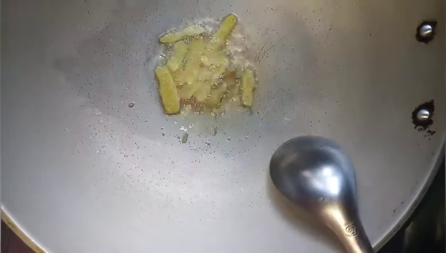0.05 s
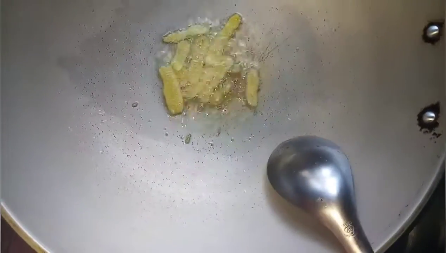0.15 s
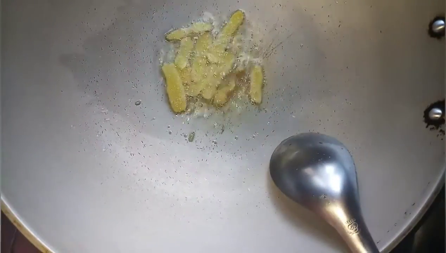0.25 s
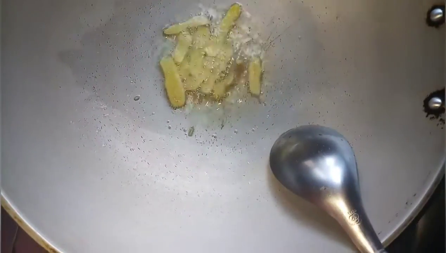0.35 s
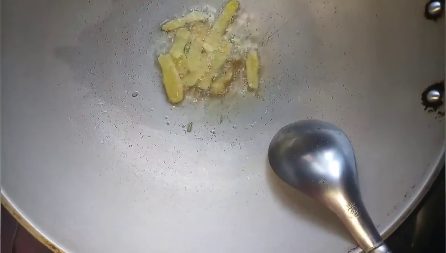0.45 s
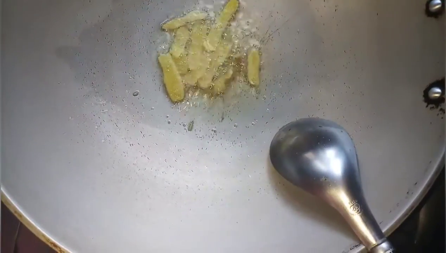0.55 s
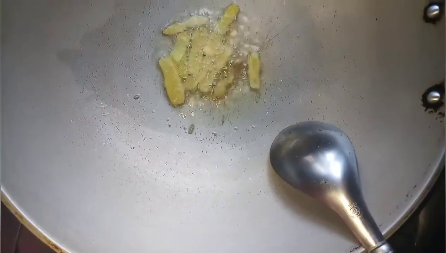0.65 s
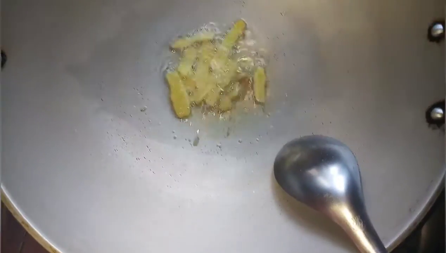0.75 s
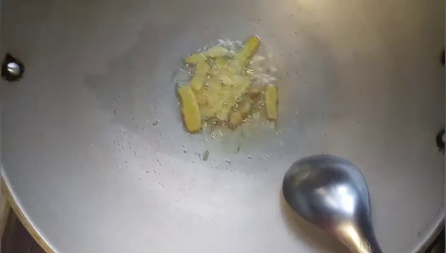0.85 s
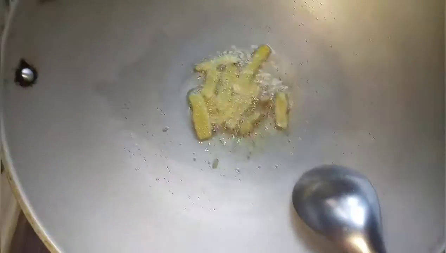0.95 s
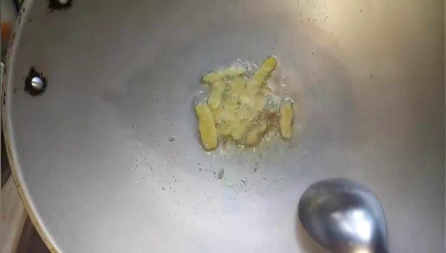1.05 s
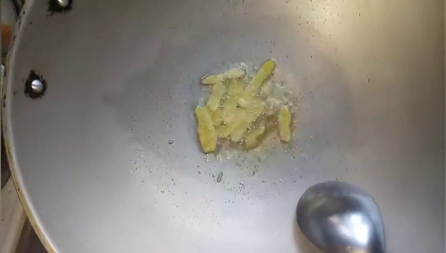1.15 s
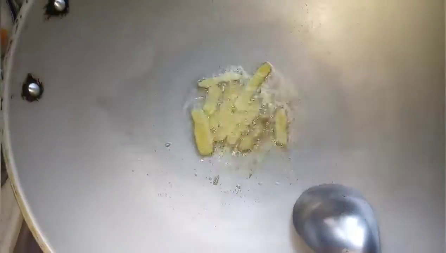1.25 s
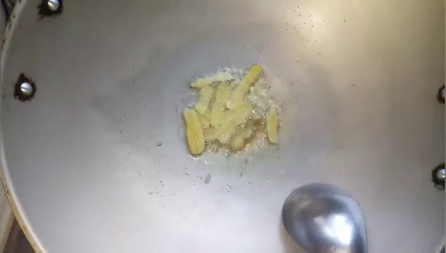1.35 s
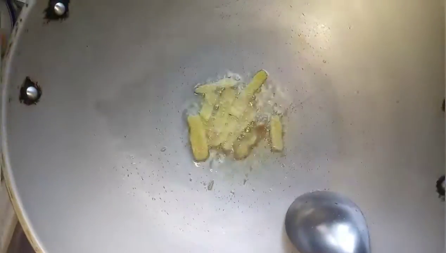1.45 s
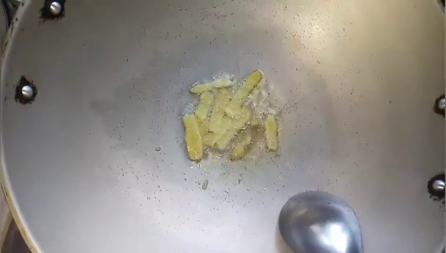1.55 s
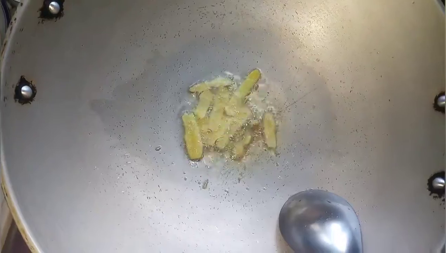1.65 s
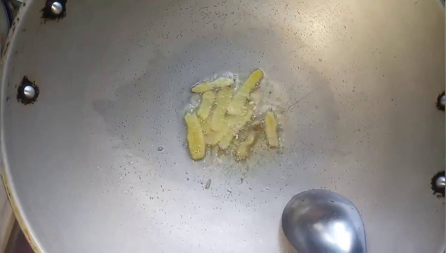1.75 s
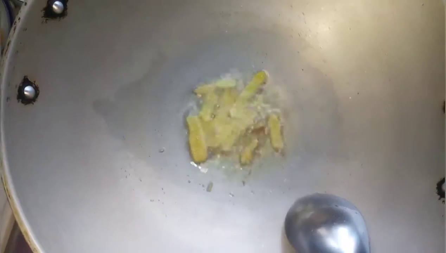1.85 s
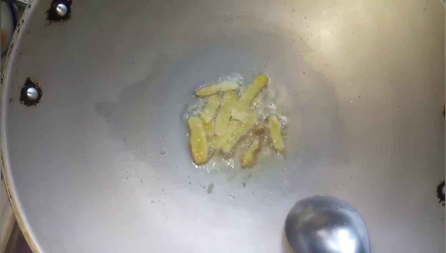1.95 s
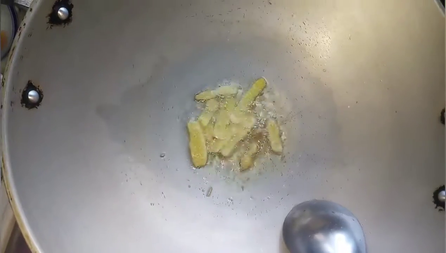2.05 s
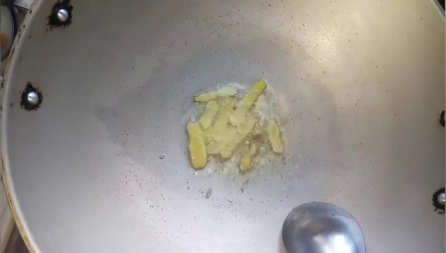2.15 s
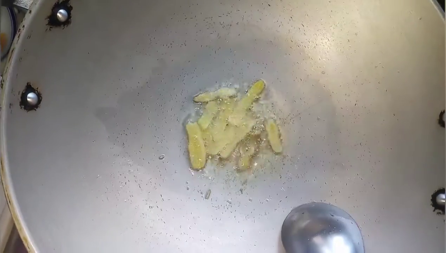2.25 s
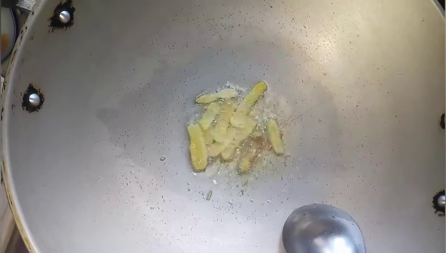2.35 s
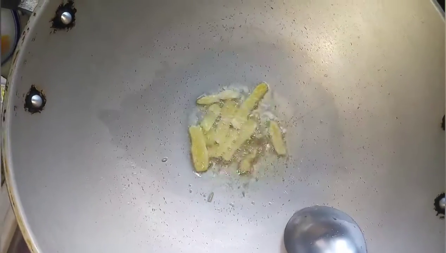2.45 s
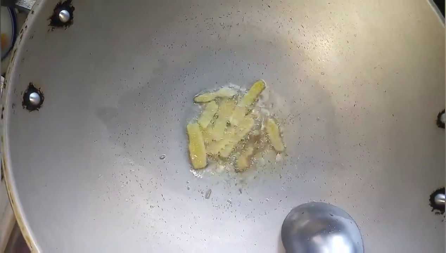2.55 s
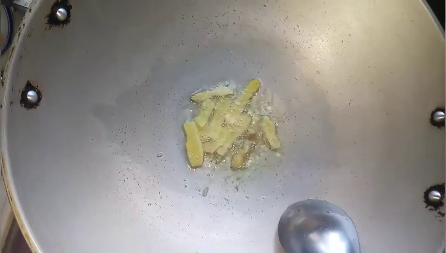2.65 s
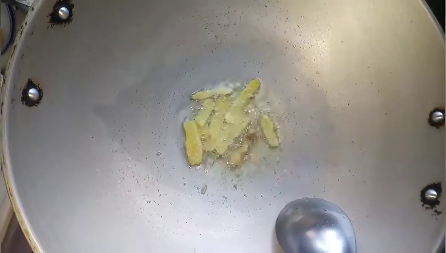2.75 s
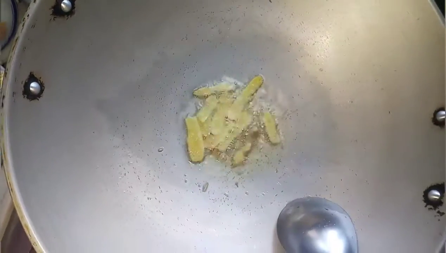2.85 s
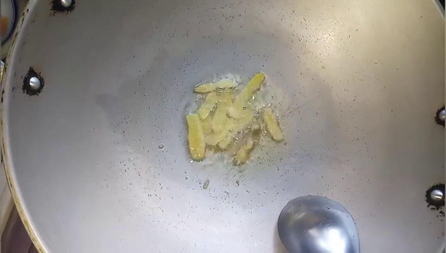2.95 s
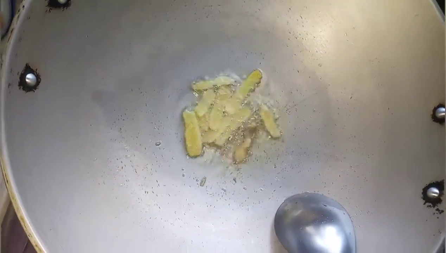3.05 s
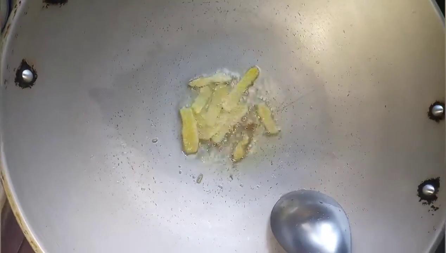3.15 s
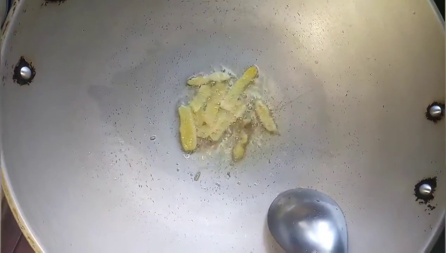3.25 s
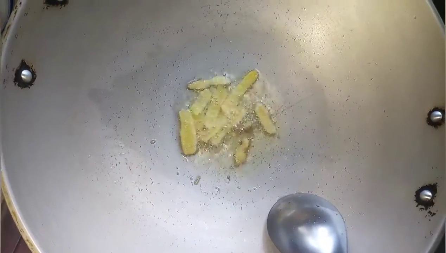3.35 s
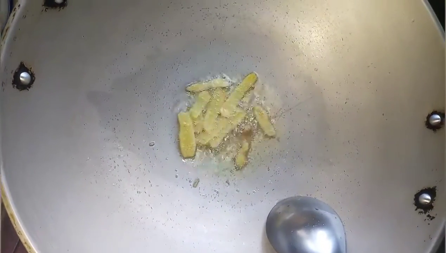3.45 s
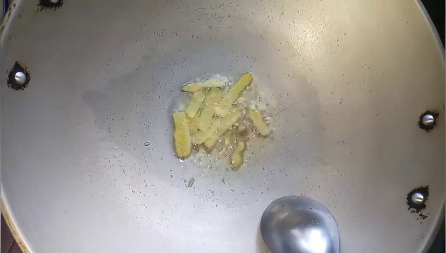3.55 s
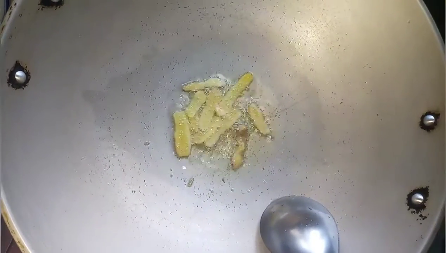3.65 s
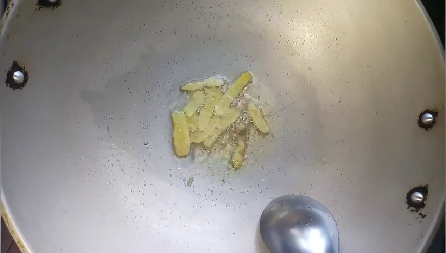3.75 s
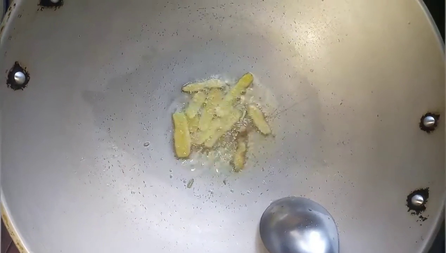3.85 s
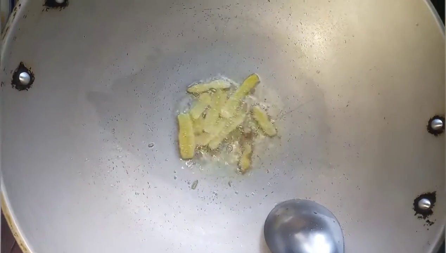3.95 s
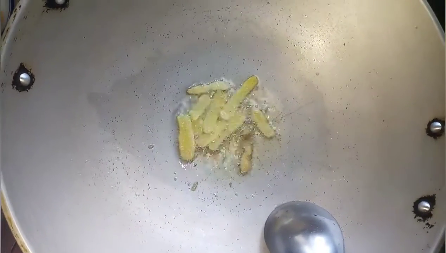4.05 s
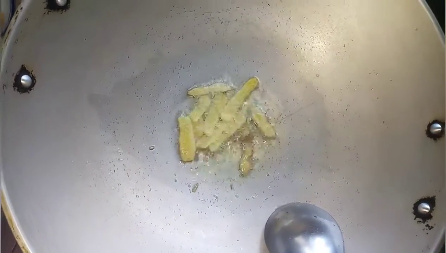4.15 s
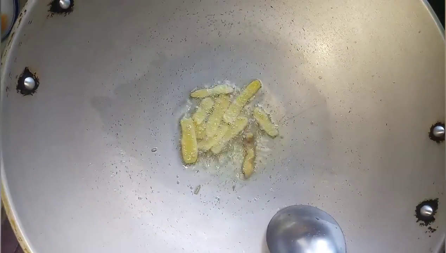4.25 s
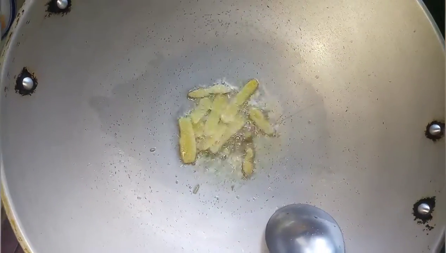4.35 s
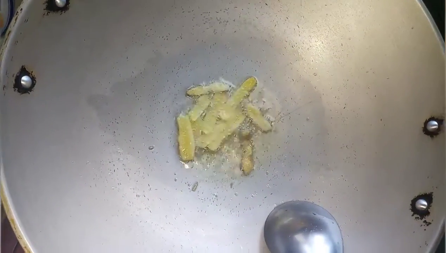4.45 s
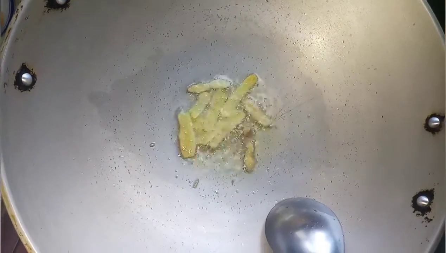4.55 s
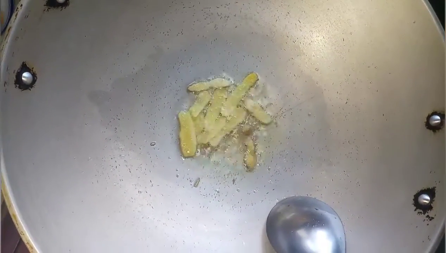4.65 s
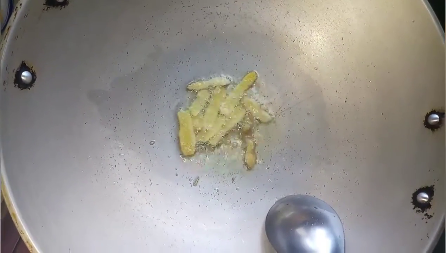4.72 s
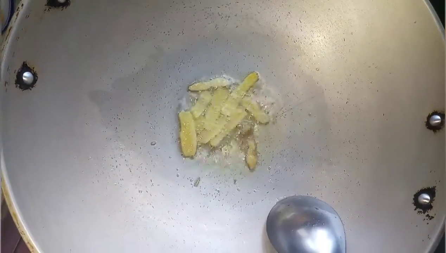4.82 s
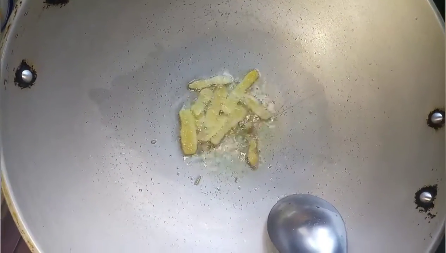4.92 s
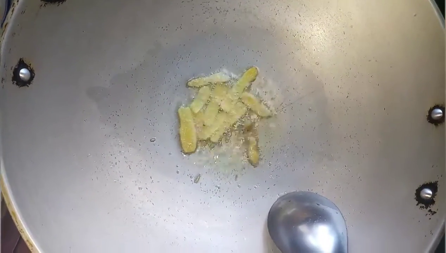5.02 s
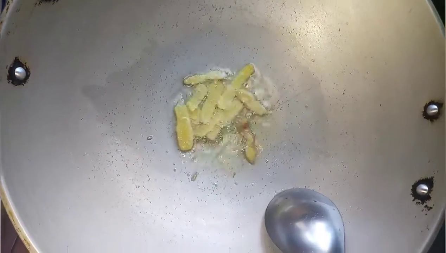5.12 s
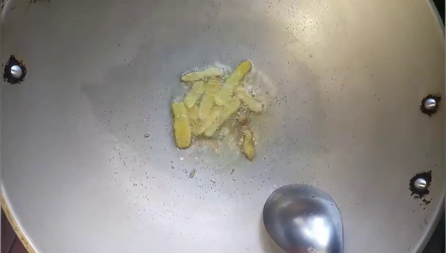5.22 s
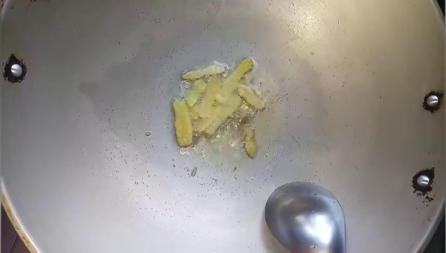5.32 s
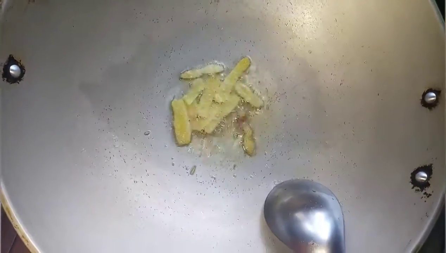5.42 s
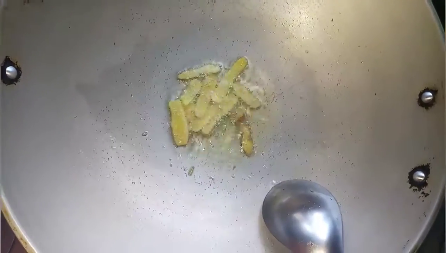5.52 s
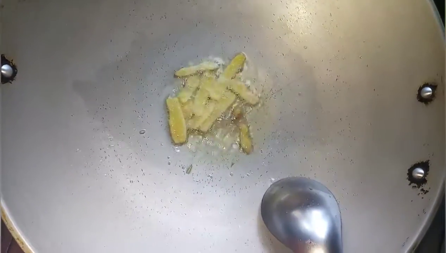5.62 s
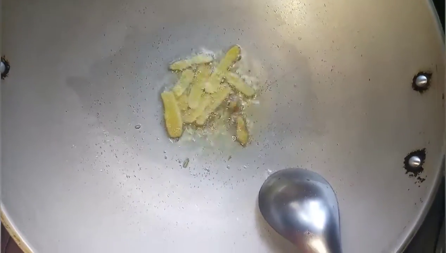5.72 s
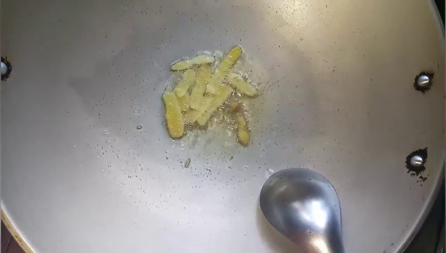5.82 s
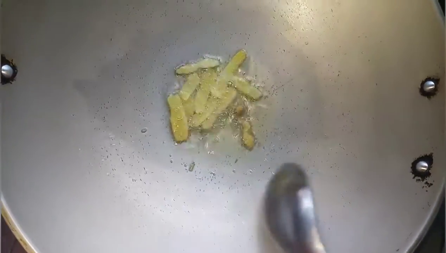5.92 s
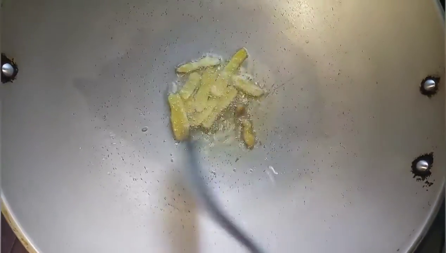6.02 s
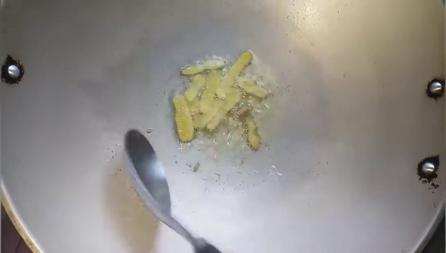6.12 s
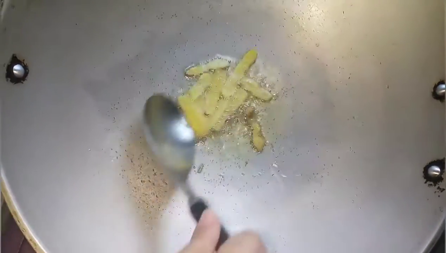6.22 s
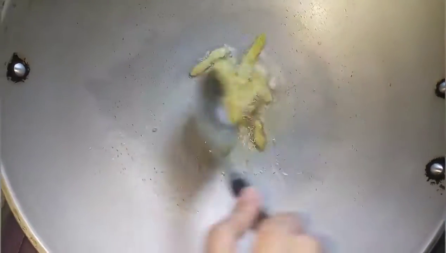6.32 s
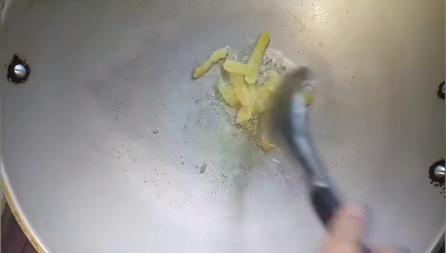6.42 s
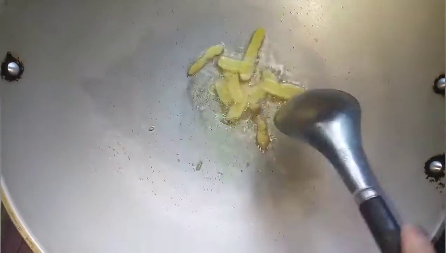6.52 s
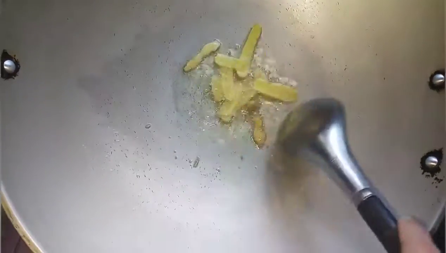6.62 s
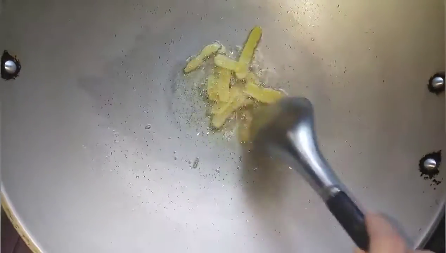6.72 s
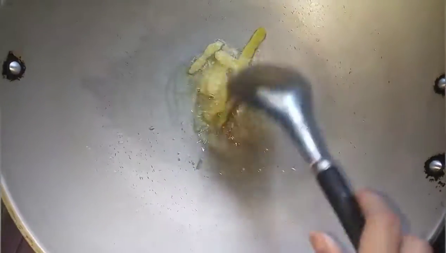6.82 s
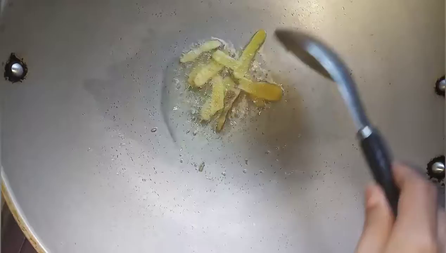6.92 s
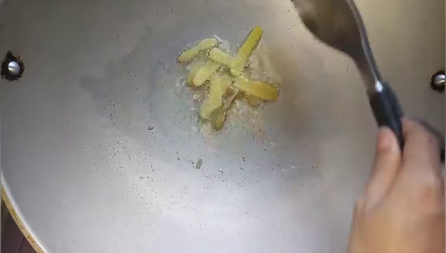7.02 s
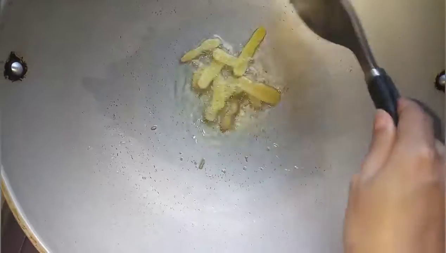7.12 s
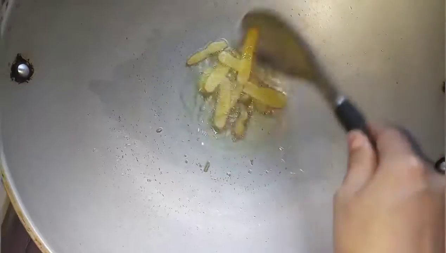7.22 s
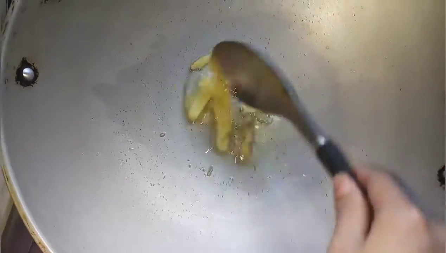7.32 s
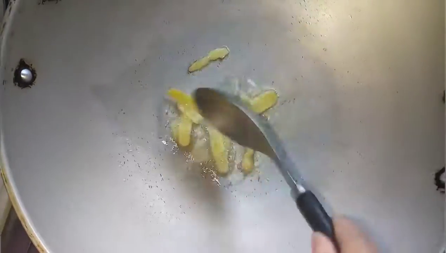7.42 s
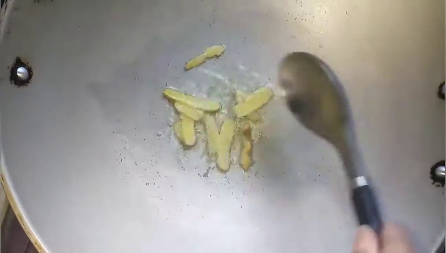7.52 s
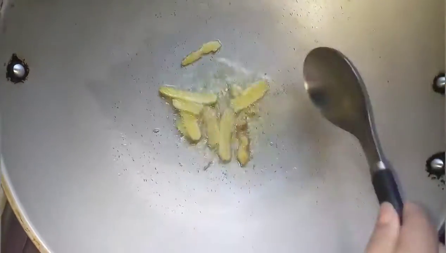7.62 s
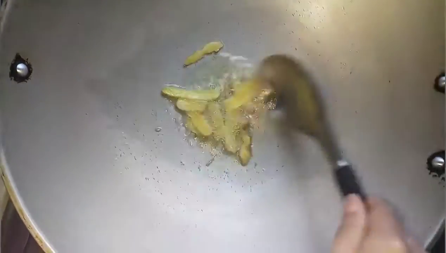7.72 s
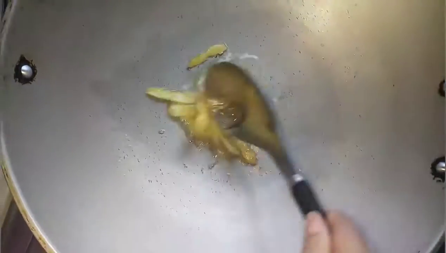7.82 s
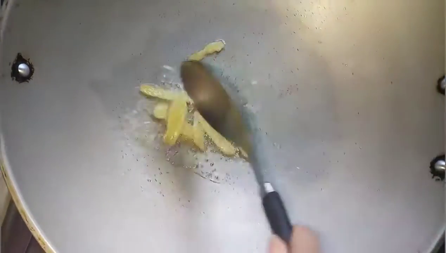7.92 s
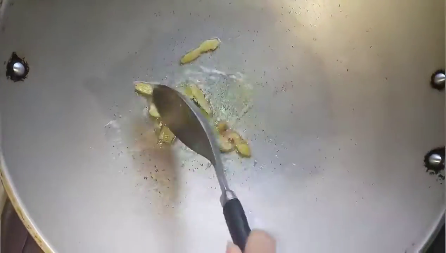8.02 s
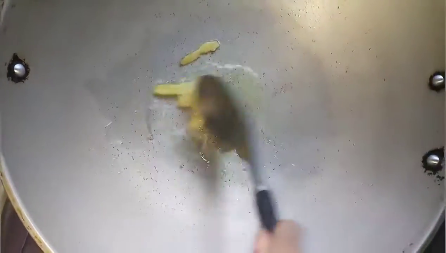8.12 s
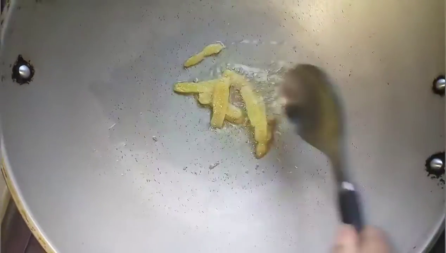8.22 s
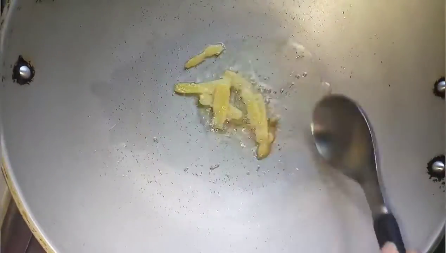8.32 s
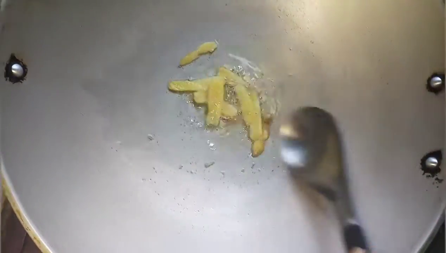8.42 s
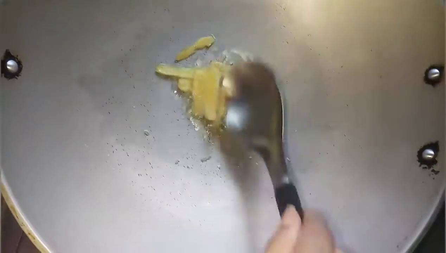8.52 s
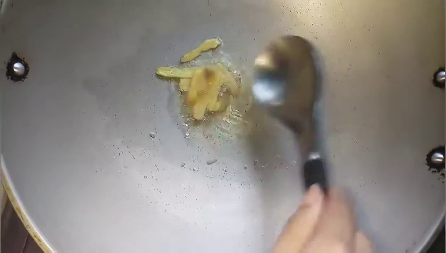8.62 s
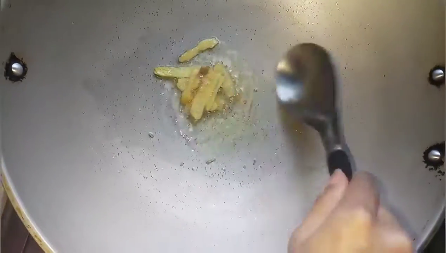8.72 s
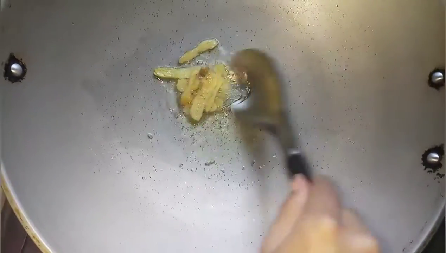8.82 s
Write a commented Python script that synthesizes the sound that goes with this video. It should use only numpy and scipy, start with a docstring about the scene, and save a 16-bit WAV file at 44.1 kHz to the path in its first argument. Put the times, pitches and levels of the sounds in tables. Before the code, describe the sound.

Close above a thin metal wok, ginger strips fry in a little oil with a soft steady fizz over low burner rumble and a faint wavering hum. A ladle clacks down and scrapes briefly at the start. Then only sizzle and sharp spitting pops for several seconds, until the ladle returns after six seconds, striking and scraping the metal in spaced bright clanks. Small, fairly dry kitchen, stereo.

```python
"""Ginger strips sizzle in hot oil in a thin metal wok, over the rumble and hum of a kitchen: shaped noise and low tones.
A metal ladle knocks the wok, bounces and scrapes along it: clicks excite damped modes of metal.
Steam bubbles burst and spit: short sprays of clicks excite resonances of bubble and bowl.
A small device with two microphone ports hangs above the pan and takes one knock, a brief falling tone."""
import sys
import numpy as np
from scipy import signal
from scipy.fft import rfft, irfft, next_fast_len
from scipy.io import wavfile
from scipy.ndimage import uniform_filter1d

SR = 44100
rng = np.random.default_rng(int(sys.argv[2]) if len(sys.argv) > 2 else 0)


def store_pcm(level_fs):
    """Save levels as 16-bit WAV."""
    pcm = np.round(np.clip(level_fs, -1, 1) * 32767).astype(np.int16)
    wavfile.write(sys.argv[1], SR, np.atleast_2d(pcm).T)


def natural_amplitude(level_db):
    """Convert a level in decibels to a linear amplitude factor, elementwise."""
    exponent = np.asarray(level_db, float) / 20
    return 10 ** exponent


N = 391166  # length in samples

# How hard the oil boils. Each row: time in seconds, relative level in dB.
BOIL_LEVEL = [(0.0, -47), (0.39, -49.5), (1.68, -46), (2.74, -47), (3.68, -46.5), (4.37, -47), (4.99, -47),
              (6.3, -47.5), (7.61, -50.5), (8.1, -50), (8.35, -46), (8.87, -48)]
# Spectrum of the sizzle. Each row: frequency in Hz, relative density in dB per Hz.
SIZZLE_SPECTRUM = [(290, -54), (500, -6), (698, -5.5), (868, -13), (1020, -5), (1480, -2), (1690, -4.5),
                   (3150, -5), (4400, -3.5), (7000, -3), (13300, -18.5), (16000, -25)]
# The air in the bowl lifts some bands and cancels others. Each row: centre in Hz, width in Hz, gain in dB.
BOWL_AIR = [(900, 23, -5), (993, 78, 6.5), (1240, 19, -21.5), (1484, 240, 2.5), (1650, 140, -10),
            (2256, 50, 6.5), (2800, 22, 8.5), (3140, 46, 12.5), (3496, 360, 7), (7130, 260, 2),
            (8180, 260, 3), (9300, 550, 1.5)]
# Spectrum of burner and room rumble. Each row: frequency in Hz, relative density in dB per Hz.
RUMBLE_SPECTRUM = [(12, -55), (20, -23), (54, -12), (82, -2.5), (113, -1), (151, -5.5), (191, -9.5),
                   (242, -2), (301, -10), (380, -6.5), (872, -32.5), (1010, -29), (1500, -22.5),
                   (1950, -71), (3300, -120)]
# Level of the wavering low tone. Each row: time in seconds, rms level in dB.
HUM_LEVEL = [(0.0, -63), (2.05, -57), (5.83, -57.5), (6.3, -60), (8.87, -60)]
# A fuzzier tone above the hum. The row: frequency in Hz, width of each resonance in Hz, rms level in dB.
DRONE_TONE = (147, 12.8, -62)
# Likeness of the two ports in steady sound. Each row: frequency in Hz, correlation of left and right.
PORT_LIKENESS = [(60, 0.96), (180, 0.97), (550, 0.73), (1650, 0.18), (4970, 0.01), (15000, 0.02)]
# Balance of the ports in steady sound. Each row: frequency in Hz, left minus right in dB.
STEADY_BALANCE = [(60, 0.0), (180, -1), (550, 0.5), (1650, -0.5), (4970, -3.5), (15000, 4)]
# Strokes of the ladle along the wok. Each row: mid modes in dB, lowest modes in dB,
# pressure curve of points (time in seconds, level in dB).
LADLE_STROKES = [ (-8.5, -16, [(0.08, -54), (0.088, -41.5), (0.126, -52), (0.182, -53), (0.23, -71)]),
                 (-10, -15.5, [(0.245, -43), (0.259, -23.5), (0.295, -36.5), (0.353, -57), (0.38, -69)]),
                 (-12, -17, [(5.928, -66), (5.94, -47), (5.978, -42), (6.02, -75)]),
                 (-22, -15, [(6.222, -15.5), (6.246, -36.5), (6.276, -31), (6.338, -33), (6.39, -58)]),
                 (-16, -5, [(6.775, -27), (6.779, -31.5), (6.87, -53.5)]), (-30, -19, [(7.258, -20),
                 (7.268, -29.5), (7.31, -29), (7.38, -61)]), (-17, -14.5, [(7.78, -31.5), (7.81, -28.5),
                 (7.822, -39.5), (7.87, -54)]), (-26, -14.5, [(8.47, -32), (8.484, -35), (8.524, -33.5),
                 (8.54, -28.5), (8.598, -54.5), (8.64, -50)]), (-23.5, -13, [(8.792, -23), (8.834, -39),
                 (8.856, -29.5), (8.869, -35)]), ]
# Ladle blows and bounces. Each row: start in seconds, nominal peak in dB,
# frequency in Hz favoured by the place of contact, thud in dB, thud frequency in Hz.
LADLE_BLOWS = [(0.0866, -26.5, 3830, -10.5, 907), (0.258, -12.5, 3660, -23, 900),
               (5.8995, -36, 3550, -9, 554), (5.9384, -27, 3620, -24, 400), (6.187, -29, 3420, -20, 400),
               (6.2014, -8, 3300, -22, 420), (6.2159, -14, 3960, -32, 363), (6.759, -9, 3700, -12, 1000),
               (7.2447, -8.5, 3140, -28, 350), (7.7508, -34.5, 6820, -23, 400),
               (7.7775, -21, 3100, -14, 400), (8.4583, -9.5, 3880, -27, 400), (8.774, -26, 5000, -24, 500),
               (8.778, -9, 4300, -23, 1500), (8.851, -20, 3130, -32, 1360)]
# Strong modes of wok and ladle in contact. Each row: frequency in Hz, strength in dB,
# 60 dB decay in seconds before the damping of the contact.
METAL_MODES = [(217, -3.5, 0.15), (380, -6.5, 0.12), (538, -4.5, 0.061), (678, -9.5, 0.064),
               (876, -13.5, 0.1), (1135, -15, 0.061), (1420, -4, 0.14), (2285, -3, 0.13), (2440, -6, 0.15),
               (2775, -7.5, 0.16), (3120, 0.5, 0.15), (3144, 3.5, 0.073), (3470, -27, 0.089),
               (3510, 3, 0.059), (3660, -14, 0.064), (3880, 3.5, 0.087), (4020, 3.5, 0.11),
               (3960, -4, 0.16), (4630, 1.5, 0.07), (4850, -5.5, 0.091), (5310, 5.5, 0.042),
               (5870, 3.5, 0.025), (6580, -8.5, 0.065), (6750, 0.5, 0.06), (6940, -22, 0.059),
               (7620, -18, 0.099), (8400, -27, 0.076), (9000, -24, 0.091), (10600, -13, 0.11),
               (12600, -27, .06)]
# Weak modes of the thin sheet, too close to tell apart. Each row: frequency in Hz, relative density in dB per Hz.
SHEET_SPECTRUM = [(88, -41), (150, -24), (376, -3), (774, -11.5), (1450, -1), (1720, -5.5), (2360, -8),
                  (2650, -12.5), (3100, 7), (3920, 3.5), (4410, -6), (6910, -2.5), (10500, -18),
                  (14500, -30), (16500, -40)]
# Bursting bubbles. Each row: start in seconds, nominal peak in dB, bubble frequency in Hz, crack gain in dB.
BUBBLE_BURSTS = [(0.5547, -19.5, 5780, -18.5), (0.647, -27, 5170, -14), (0.767, -22.5, 3190, -13.5),
                 (1.037, -34.5, 1042, -14), (1.6532, -38, 3250, -21), (1.721, -22, 5700, -20.5),
                 (1.955, -38, 3470, -10), (2.1127, -8.5, 3680, -22), (2.3433, -26, 7300, -24),
                 (2.376, -28, 5100, -11), (2.4178, -11, 4080, -28), (2.9203, -35, 3240, -21),
                 (2.921, -36, 1400, -21), (3.4535, -38, 1400, -21), (6.09, -36, 1900, -15),
                 (3.017, -40, 4600, -21), (3.0713, -38, 7300, -8), (3.4527, -31.5, 3404, -21),
                 (3.6235, -9, 3090, -26), (3.689, -21, 5170, -16), (4.0457, -34, 8600, -15),
                 (4.1754, -39, 5900, -19), (4.3685, -31, 3170, -6), (4.46, -38, 1980, -15),
                 (4.7104, -36.5, 7900, -23), (5.04, -40, 3090, -23), (5.1061, -29, 5500, -10),
                 (5.2106, -23, 6560, -19.5), (6.121, -31.5, 7200, -21), (7.104, -35.5, 5540, -13),
                 (7.1526, -42, 7300, -21), (7.432, -20, 3640, -14), (7.6199, -24, 5870, -18),
                 (8.1362, -32, 3760, -1), (8.231, -32, 3400, -10), (8.2422, -29.5, 3400, -2)]
# Knocks on the device. Each row: start in seconds, amplitude in dB, mean frequency in Hz, length in seconds.
DEVICE_KNOCKS = [(2.531, -30.5, 190.0, 0.0089)]
# Reverberation of the walls. Each row: frequency in Hz, 60 dB decay in seconds.
WALL_DECAY = [(200, 0.092), (1000, 0.31), (4000, 0.19), (10000, 0.18)]
# Balance of the ports in pan sounds. Each row: frequency in Hz, left minus right in dB.
PAN_BALANCE = [(60, 2), (150, -1), (380, -1), (950, 4.5), (2380, -5.5), (5980, -4), (15000, -0.5)]
# Response of both ports to pan sounds. Each row: frequency in Hz, gain in dB.
PORT_RESPONSE = [(30, -30), (130, -2.5), (300, 3), (8000, 5), (11000, 1.5), (15500, -12), (17500, -60)]

RUMBLE_DB = -54  # rms level
HUM_HZ, HUM_WAVER_HZ = 87.4, 3.44  # mean frequency and rms deviation
HUM_LEAD = 0.3  # radians by which the hum reaches the left port first
# Slope in dB per octave above the favoured band for a 0 dB blow, and what each dB less takes from it.
HARD_TREBLE_DB, SOFTENING, BLOW_DAMPING = 0, 0.23, 0.56
# As the ladle slides its contact flattens: treble at the start, then drift of treble, mid and lowest modes.
EDGE_TREBLE_DB, TREBLE_DB_PER_S, MID_DB_PER_S, LOWEST_DB_PER_S = 1.5, -33, 65, -46
RASP_DB = 9.0  # lift of the finest grit, from about 11 kHz up
SPIT_S, SPIT_S_PER_DB = 0.016, 0.0003  # length of spitting at 0 dB; weaker bursts are shorter
# Higher bubbles ring over a wider band: reference pitch, its width, exponent and least width.
BUBBLE_HZ, BUBBLE_WIDTH_HZ, WIDENING, NARROWEST_HZ = 4000, 1150, 1.1, 780


def evened(x):
    """Normalization: scales a signal to an rms value of 1."""
    return x / np.sqrt(np.mean(x ** 2) + 1e-20)


def read(points, hz):
    """Interpolation of a spectrum along a logarithmic frequency axis."""
    f, value = np.transpose(points)
    return np.interp(np.log(hz + 1), np.log(f + 1), value)


def add(mix, s, sound):
    """Superposition: a sound of one or two channels joins the mix at s seconds."""
    part = mix[:, round(s * SR):][:, :sound.shape[-1]]
    part += sound[..., :part.shape[1]]


def filtered(x, db_at, lag=0.0):
    """Linear filtering by a smooth spectrum, with a delay in samples as linear phase."""
    size = next_fast_len(x.shape[-1] + 2048)
    hz = np.fft.rfftfreq(size, 1 / SR)
    delay = np.exp(-2j * np.pi * hz * lag / SR)
    return irfft(rfft(x, size) * natural_amplitude(db_at(hz)) * delay, size)[..., :x.shape[-1]]


def below(x, edge_hz):
    """Low-pass filtering: attenuation approaches 40 dB above the edge."""
    return filtered(x, lambda hz: -40 / (1 + (edge_hz / (hz + 1)) ** 8))


def resonate(x, hz, width):
    """Resonance: one complex pole with a gain of about 1 at its frequency."""
    pole = np.exp((2j * np.pi * hz - np.pi * width) / SR)
    return 2 * signal.lfilter([1 - abs(pole)], [1, -pole], x).real


def peaked(pair, peak_db):
    """Crest scaling: peak_db is set for crests taken as sqrt(6) times the rms of the loudest 4 ms."""
    power = uniform_filter1d((pair ** 2).mean(0), size=180)
    return natural_amplitude(peak_db) * pair / np.sqrt(6 * power.max())


def crackle(shape, per_s, spread_db):
    """Random impulse process: clicks of random sign and time, a few of them large."""
    size = natural_amplitude(spread_db * np.minimum(rng.exponential(1, shape), 5))
    sign = rng.choice([-1.0, 1.0], shape)
    return size * sign * (rng.random(shape) < per_s / SR)


def coloured(pair, db_at, patchy_db):
    """Partial coherence: two unrelated signals gain a spectrum, drifting patches and port likeness."""
    hz, t, (left, other) = signal.stft(pair, SR, nperseg=1024, noverlap=768)
    patches = uniform_filter1d(rng.standard_normal(left.shape), 12, 0)
    patches = evened(uniform_filter1d(patches, 10, 1))
    same = np.clip(read(PORT_LIKENESS, hz), -1, 1)[:, None]
    lean_db = read(STEADY_BALANCE, hz)[:, None]
    right = same * left + np.sqrt(1 - same ** 2) * other
    z = np.array([left * natural_amplitude(lean_db / 2), right * natural_amplitude(-lean_db / 2)])
    z *= natural_amplitude(db_at(hz)[:, None] + patchy_db * patches)
    return evened(signal.istft(z, SR, nperseg=1024, noverlap=768)[1][:, :N])


def bowl_db(hz):
    """Air resonance and cancellation: peaks and dips of the bowl."""
    return sum(db / (1 + (2 * (hz - f) / width) ** 2) for f, width, db in BOWL_AIR)


def sizzle():
    """Superposed bubble bursts: a dense fizz of tiny ones, and sparser larger ones of a few cycles each."""
    fizz = evened(crackle((2, N), per_s=9000.0, spread_db=2.5))
    t = np.arange(1500) / SR
    for hz in np.geomspace(1000, 11000, num=16):
        echoes = rng.standard_normal((2, len(t))) * natural_amplitude(-60 * t / 0.092)  # the bowl smears each burst
        burst = resonate(echoes, hz, 0.29 * hz)
        times = rng.uniform(0, N / SR, size=60)
        for s, size in zip(times, rng.exponential(1, size=60)):
            add(fizz, s, natural_amplitude(-5.5 + 2.0 * min(size, 4)) * burst)
    s, boil_db = np.transpose(BOIL_LEVEL)
    level = natural_amplitude(np.interp(np.arange(N) / SR, s, boil_db) + 2.5)
    return level * coloured(fizz, lambda hz: read(SIZZLE_SPECTRUM, hz) + bowl_db(hz), patchy_db=1.8)


def kitchen():
    """Broadband and tonal noise: burner and room rumble, a frequency-modulated hum and a resonant drone."""
    rumble = coloured(rng.standard_normal((2, N)), lambda hz: read(RUMBLE_SPECTRUM, hz), patchy_db=-0.1)
    s, db = np.transpose(HUM_LEVEL)
    waver = uniform_filter1d(rng.standard_normal(N), size=3000)
    waver = evened(uniform_filter1d(waver, size=3000))
    turns = np.cumsum(HUM_HZ + HUM_WAVER_HZ * waver) / SR
    hum_level = np.sqrt(2) * natural_amplitude(np.interp(np.arange(N) / SR, s, db))
    hum = hum_level * np.sin(2 * np.pi * turns + [[HUM_LEAD], [0]])
    hz, width, drone_db = DRONE_TONE
    shared, *own = rng.standard_normal((3, N))
    drone = resonate(shared + 0.25 * np.array(own), hz, width)
    drone = natural_amplitude(drone_db) * evened(resonate(drone, hz, width))
    return natural_amplitude(RUMBLE_DB) * rumble + hum + drone


def ring(tilt_db, damping, place_db, sheet_db):
    """Modal superposition: after one click, strong modes weighted by chance of place, over dense weak ones."""
    hz, db, t60 = np.transpose(METAL_MODES)[:, :, None]
    weight, detune, turn = rng.standard_normal((3, len(METAL_MODES), 1))
    t = np.arange(round(0.17 * min(damping, 1) * SR)) / SR
    short = np.minimum(hz / 2500, 1)  # long waves care little where they are struck or heard
    db = db + tilt_db(hz) + place_db * short * weight - 60 * t / (t60 * damping)
    phase = 2 * np.pi * hz * (1 + 0.005 * detune) * t
    shift = 1.26 * turn * short  # each short wave reaches the right port with its own phase
    modes = np.array([(natural_amplitude(db) * np.sin(phase + port * shift)).sum(0) for port in range(2)])
    left, right = rng.standard_normal((2, len(t)))
    right = right + below(left - right, 1040.0)  # long waves reach both ports alike
    sheet = filtered(np.array([left, right]), lambda f: read(SHEET_SPECTRUM, f) + tilt_db(f + 1))
    sheet_level = natural_amplitude(sheet_db - 60 * t / (0.09 * damping))
    rise = (1 - np.exp(-t / 0.00027)) ** 2  # the contact is not quite sudden
    return rise * (evened(modes) + sheet_level * evened(sheet))


def stroke(mid_db, lowest_db, pressure):
    """Friction of rough metal: dense clicks at three places of contact drive the damped modes."""
    s, pressure_db = np.transpose(pressure)
    t = np.arange(0, s[-1] - s[0], 1 / SR)
    grit = 0
    for clicks in crackle((3, 1, len(t)), per_s=1200.0, spread_db=2.5):
        metal = ring(lambda hz: 0 * hz, damping=0.37, place_db=4.0, sheet_db=9.5)
        grit = grit + signal.oaconvolve(clicks, metal, axes=1)[:, :len(t)]
    grit = filtered(grit, lambda hz: RASP_DB / (1 + (11200.0 / (hz + 1)) ** 6))
    lowest, low, dull = below(grit, 780.0), below(grit, 2170.0), below(grit, 5100.0)
    treble = natural_amplitude(EDGE_TREBLE_DB + TREBLE_DB_PER_S * t) * (grit - dull)
    scrape = (dull - low + treble) / np.std(grit - low)
    mid = natural_amplitude(mid_db + MID_DB_PER_S * t) * evened(low - lowest)
    bottom = natural_amplitude(lowest_db + LOWEST_DB_PER_S * t) * evened(lowest)
    level = natural_amplitude(np.interp(t + s[0], s, pressure_db))
    return level * (scrape + mid + bottom) * signal.windows.tukey(len(t), 0.15)


def blow(peak_db, centre_hz, thud_db, thud_hz):
    """Impact excitation: the ladle's edge chatters as it lands; its weight pushes low modes near thud_hz."""
    t = np.arange(round(0.026 * SR)) / SR
    chatter = 0.29 * crackle((1, len(t)), per_s=2500.0, spread_db=4.0) * natural_amplitude(-60 * t / 0.032)
    chatter[0, 0] = 1  # the first contact
    treble_db = HARD_TREBLE_DB + SOFTENING * peak_db

    def tilt_db(hz):
        """Contact spectrum: a thud below 1800 Hz, and above it slopes about the favoured band."""
        low_db = thud_db + 18.5 - 5.3 * abs(np.log2(hz / thud_hz))
        high_db = np.where(hz < centre_hz, 9.0, treble_db) * np.log2(hz / centre_hz)
        return np.where(hz < 1800, low_db, high_db)

    metal = ring(tilt_db, BLOW_DAMPING, place_db=3.0, sheet_db=9.0)
    return peaked(signal.oaconvolve(chatter, metal, axes=1), peak_db)


def pop(peak_db, hz, crack_db):
    """Bubble resonance: a bursting, spitting bubble sounds its own pitch, a wide crack and the ring of the bowl."""
    t = np.arange(round(0.2 * SR)) / SR
    length = max(SPIT_S + SPIT_S_PER_DB * peak_db, 0.003)
    tail = 0.3 * natural_amplitude(-60 * (t - length) / 0.06)
    fading = np.where(t < length, natural_amplitude(-6.0 * t / length), tail)
    shared, *own = crackle((3, len(t)), per_s=6600.0, spread_db=2.0) * fading
    shared[0] = 4.5  # the skin tears first
    spit = shared + 1.18 * np.array(own)  # the bowl throws the spray to the two ports by different paths
    width = max(BUBBLE_WIDTH_HZ * (hz / BUBBLE_HZ) ** WIDENING, NARROWEST_HZ)
    bubble = resonate(resonate(spit, hz, width), hz, width)
    bubble = resonate(bubble, hz, 1.6 * width)
    crack = resonate(spit * natural_amplitude(-60 * t / 0.15), 5300.0, 2800.0)
    crack = resonate(crack, 6200.0, 3700.0)
    bowl = resonate(resonate(spit, 3570.0, 390.0), 5060.0, 1150.0)
    return peaked(bubble + natural_amplitude(crack_db) * (crack + natural_amplitude(24.0) * bowl), peak_db)


def bump(peak_db, hz, length):
    """Transient oscillation: a knock on the device gives a brief tone of falling pitch."""
    u = np.arange(round(length * SR)) / (length * SR)
    tone = np.sin(2 * np.pi * hz * length * u ** 0.52)
    return natural_amplitude(peak_db) * tone * np.sin(np.pi * u ** 0.3)


def ports(pair):
    """Two-point reception: each port has its own balance, and the right one hears the pan 5.3 samples later."""
    left = filtered(pair[0], lambda hz: read(PORT_RESPONSE, hz) + read(PAN_BALANCE, hz) / 2)
    right = filtered(pair[1], lambda hz: read(PORT_RESPONSE, hz) - read(PAN_BALANCE, hz) / 2, lag=5.3)
    return np.array([left, right])


def walls(x):
    """Reverberation: sparse echoes of random sign, each band dying at its own speed."""
    taps = np.zeros((2, SR // 2))
    jitter = rng.integers(0, 20, (2, (SR // 2 - 81) // 20))
    at = np.arange(80, SR // 2 - 20, 20) + jitter  # one echo in every 20 samples
    np.put_along_axis(taps, at, rng.choice([-1.0, 1.0], at.shape), 1)
    hz, t, z = signal.stft(taps, SR, nperseg=256)
    decay = natural_amplitude(-60 * t / read(WALL_DECAY, hz)[:, None])
    tail = signal.istft(z * decay, SR, nperseg=256)[1]
    return signal.fftconvolve(x, tail / np.linalg.norm(tail[0]), axes=1)[:, :N]


def scene():
    """Superposition of pan sounds and their echoes, the knock on the device, and steady fizz and rumble."""
    steady = sizzle() + kitchen()
    pan, device = np.zeros((2, 2, N))
    for mid_db, lowest_db, pressure in LADLE_STROKES:
        add(pan, pressure[0][0], stroke(mid_db, lowest_db, pressure))
    for s, *row in LADLE_BLOWS:
        add(pan, s, blow(*row))
    for s, *row in BUBBLE_BURSTS:
        add(pan, s, pop(*row))
    for s, *row in DEVICE_KNOCKS:
        add(device, s, bump(*row))
    heard = ports(pan)
    return steady + device + heard + natural_amplitude(-10.0) * walls(heard)


def low_pass(x):
    """Removes everything above the highest recorded frequency."""
    return signal.sosfilt(signal.butter(12, 16330, fs=SR, output="sos"), x)


def record(dry):
    """Saturation: the input stage rounds off the loudest peaks."""
    rounded = dry / (1 + dry ** 10) ** (1 / 10)
    return low_pass(rounded)


dry = scene()
out = record(dry)
store_pcm(out)
```